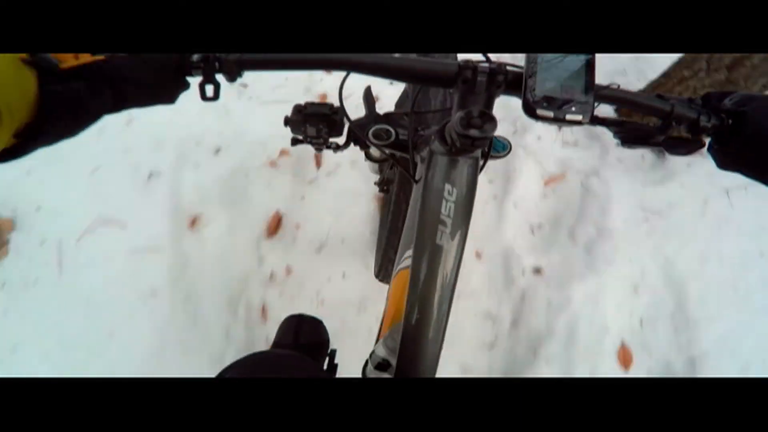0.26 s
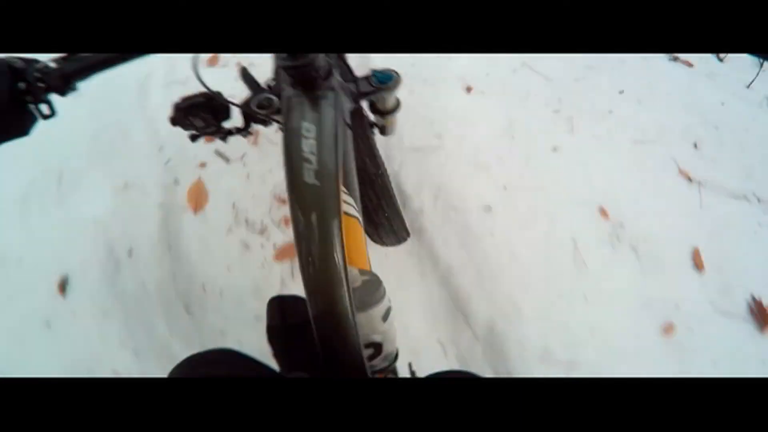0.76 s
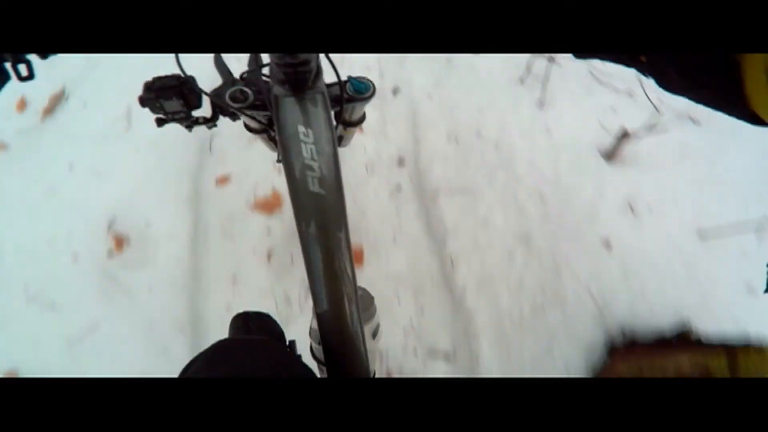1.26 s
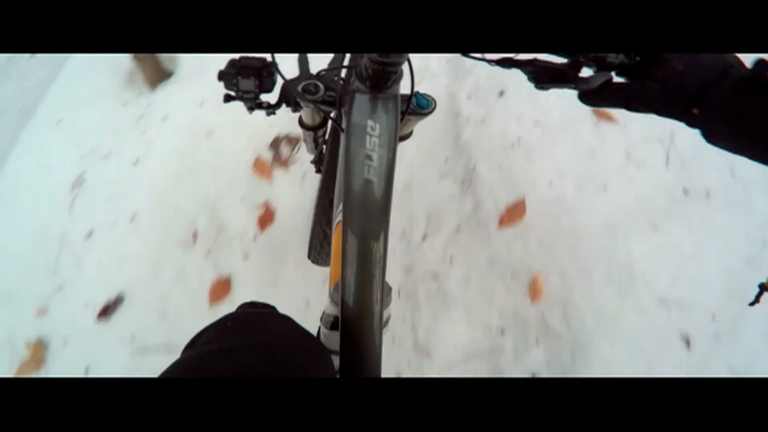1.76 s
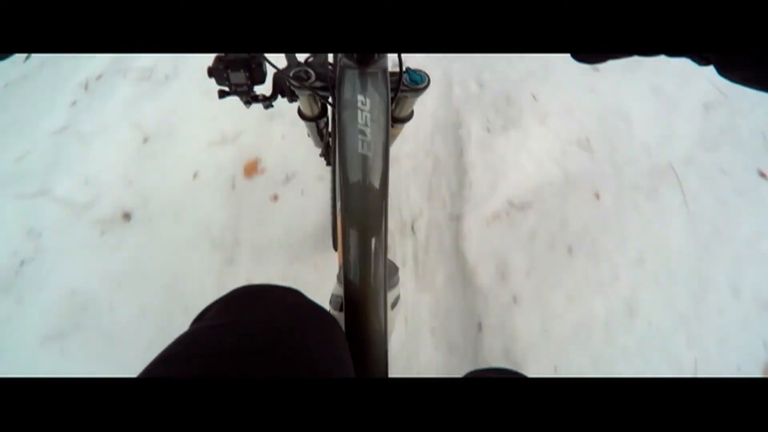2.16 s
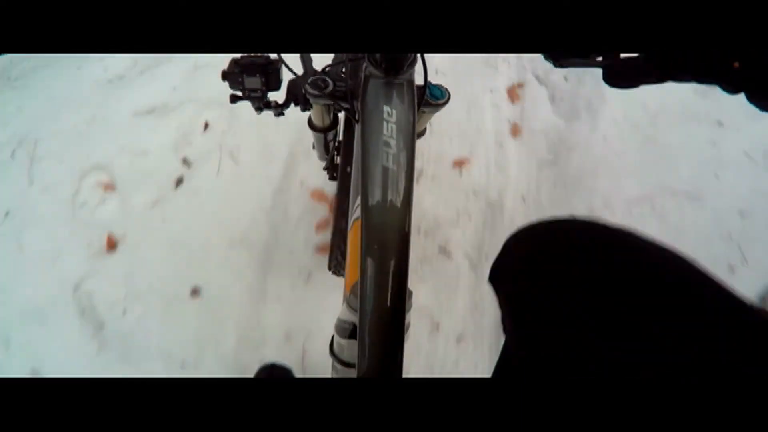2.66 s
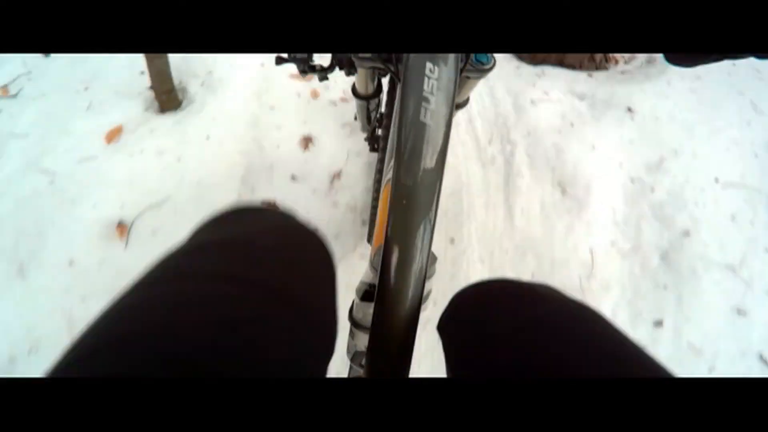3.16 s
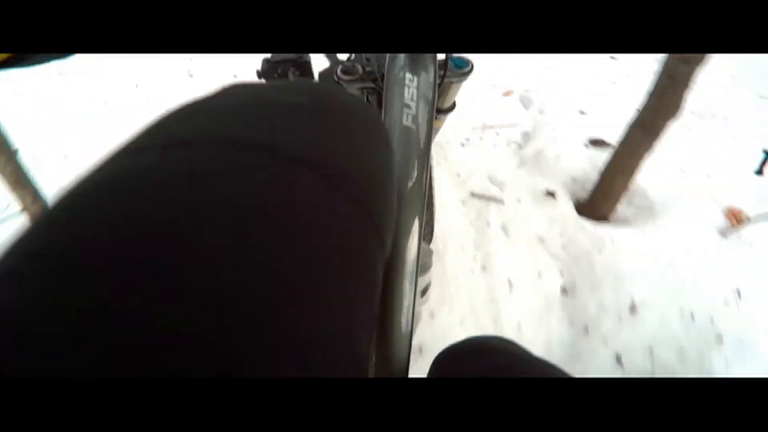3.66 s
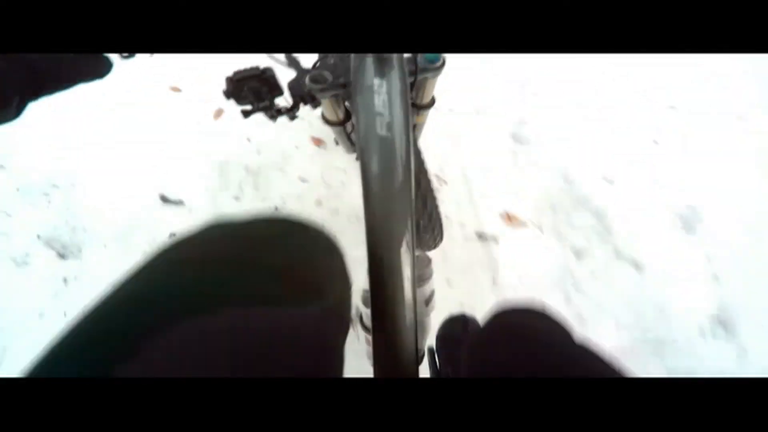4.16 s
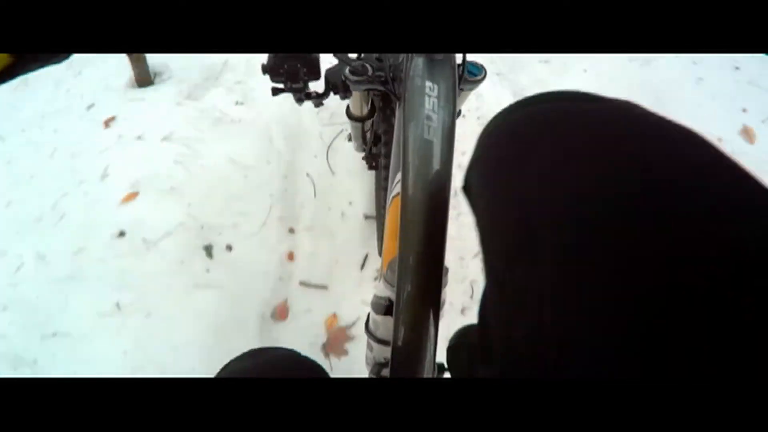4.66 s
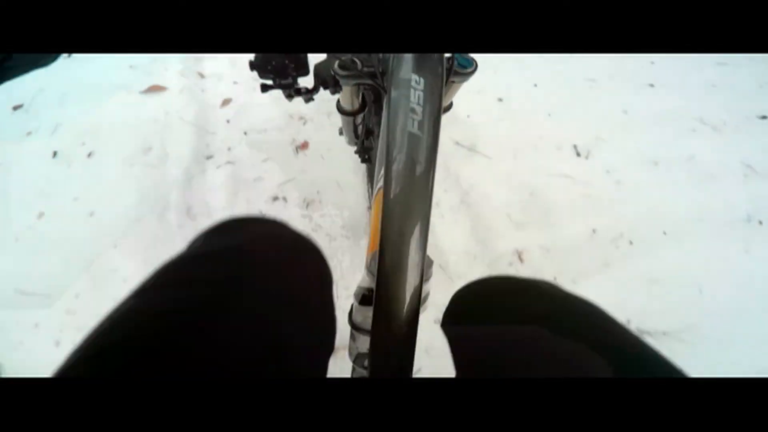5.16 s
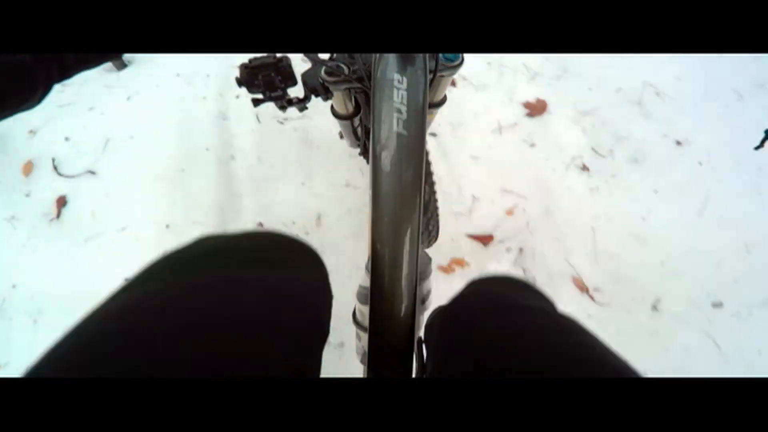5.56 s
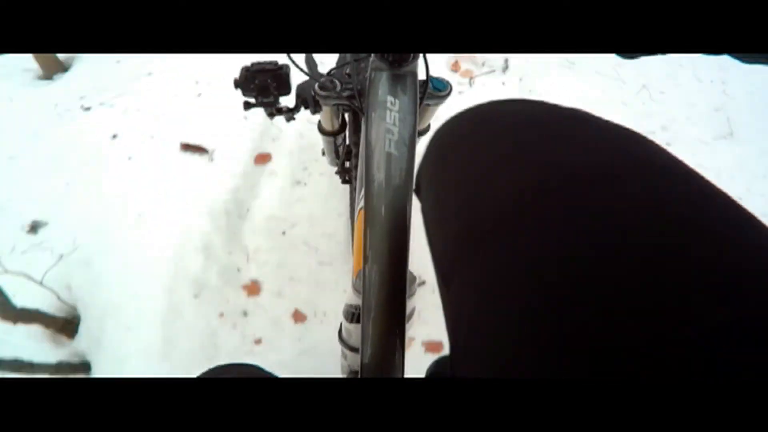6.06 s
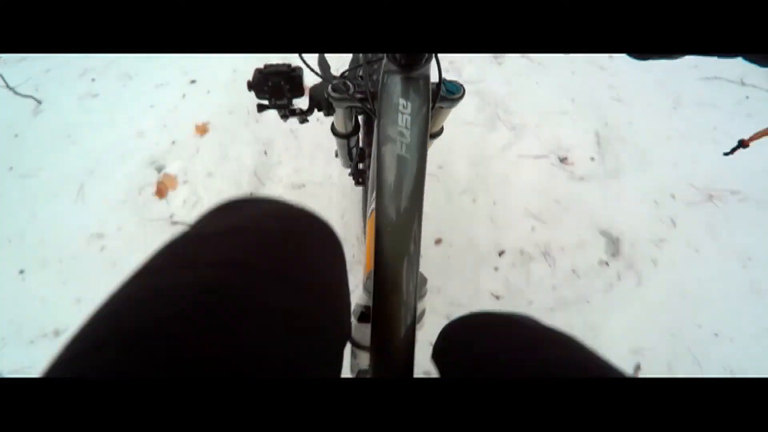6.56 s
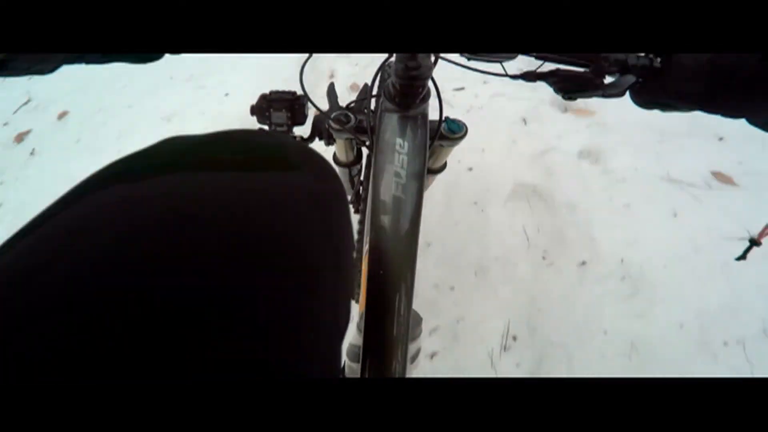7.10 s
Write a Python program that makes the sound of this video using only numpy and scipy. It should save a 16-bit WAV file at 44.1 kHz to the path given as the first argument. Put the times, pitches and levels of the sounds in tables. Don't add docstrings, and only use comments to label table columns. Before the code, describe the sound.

Close, dry outdoor sound from a small body-worn camera on a bike in snow. After a quiet half second, hollow plastic knocks clatter loudly amid snapping crust until just past one second. A lull of soft crunching follows, with one knock near two seconds. Near three, bright steel chain ticks mix with hard knocks. Then quiet rolling and faint pedalling swishes over hiss, with a few dull knocks near the end.

```python
import sys
import numpy as np
from scipy import signal
from scipy.fft import rfft, irfft, next_fast_len
from scipy.io import wavfile
from scipy.ndimage import uniform_filter1d, map_coordinates

SR = 44100
rng = np.random.default_rng(int(sys.argv[2]) if len(sys.argv) > 2 else 0)


def dump(signal):
    limited = np.clip(np.atleast_2d(signal).T, -1, 1)
    pcm = np.round(limited * 32767).astype(np.int16)
    wavfile.write(sys.argv[1], SR, pcm)


def convert_level_to_amplitude(level_db):
    exponent = np.asarray(level_db, float) / 20
    return 10 ** exponent


N = 323473


def unit(x):
    return x / np.sqrt(np.mean(x ** 2) + 1e-20)


def curves(rows):
    s, *cols = np.transpose(rows)
    return [np.interp(np.arange(N) / SR, s, c) for c in cols]


def wobble(rate):
    knots = rng.standard_normal(int(N * rate / SR) + 4)
    return map_coordinates(knots, [np.arange(N) * rate / SR])


def coloured(x, spectrum):
    m = next_fast_len(N + 8192)
    hz, db = np.transpose(spectrum)
    log_hz = np.log(np.fft.rfftfreq(m, 1 / SR) + 1)
    gain = convert_level_to_amplitude(np.interp(log_hz, np.log(hz + 1), db))
    return unit(irfft(rfft(x, m) * gain, m)[:N])


def gritty(rate, spread_db, share):
    size_db = spread_db * np.minimum(rng.exponential(size=N), 3)
    spikes = (rng.random(N) < rate / SR) * rng.standard_normal(N) * convert_level_to_amplitude(size_db)
    return unit(spikes) * np.clip(share, 0, 1) + rng.standard_normal(N) * np.clip(1 - share, 0, 1)


def patchy(x, patchy_db):
    z = signal.stft(x, nperseg=256)[2]
    field = uniform_filter1d(rng.standard_normal(z.shape), size=6, axis=0)
    field = uniform_filter1d(field, size=12, axis=1)
    return signal.istft(z * convert_level_to_amplitude(patchy_db * unit(field)), nperseg=256)[1][:N]


def ring(modes, t, extra_db, rise):
    hz, db, t60 = np.transpose(modes)[:, :, None]
    tones = convert_level_to_amplitude(db + extra_db[:, None] - 60 * t / t60) * np.sin(2 * np.pi * hz * t)
    return tones.sum(0) * (1 - np.exp(-t / rise))


# (f/Hz, level/dB, t60/s)
CASE_MODES = [(159, -7.5, 0.032), (247, -9.5, 0.019), (339, -15, 0.02), (416.5, -18, 0.027),
              (592, -16.5, 0.021), (682, -12, 0.035), (925, -18.5, 0.012), (1170, -9.5, 0.0078),
              (1329, -2, 0.02), (1384, -2.5, 0.014), (1898, -9.5, 0.017), (2370, -15, 0.017),
              (2640, -12.5, 0.0083), (3296, -8, 0.004), (3470, -27, 0.022), (4240, -60, 0.006),
              (4735, -25, 0.0098), (2060, -14, 0.016), (7380, -25, 0.007)]


def blow(t, hard_db, thump_db, lid_db, rise_ms, luck, noise):
    modes = np.array(CASE_MODES)
    hz = modes[:, 0]
    mount, rim, lid = hz < 900, hz > 3000, abs(hz - 1860) < 150
    wall = ~mount & ~rim
    level_db = hard_db * 4 * np.log2(np.clip(hz / 1400, 1, 3))
    level_db += (thump_db + 1.4 * (hard_db - .5) * np.log2(hz / 260)) * mount
    level_db += lid_db * lid + 1.5 * luck
    loaded = t * (1 - .05 * np.clip(rise_ms - .5, 0, 1.5))
    rise = max(rise_ms, .1) / 1000
    shell = ring(modes[wall], loaded, level_db[wall], rise) - ring(modes[rim], loaded, level_db[rim], rise)
    thump = ring(modes[mount], t, level_db[mount], rise=0.00037)
    crack = convert_level_to_amplitude(-13.5 + 7.3 * hard_db - 60 * t / 0.02) * noise
    return shell - thump + crack


# (t/s, peak level/dB, hardness/dB per quarter octave, thump level/dB, lid level/dB)
HARD_KNOCKS = [(0.5899, -29.5, 1.5, -5.5, 2), (0.628, -4.5, 1.7, -1.5, 5), (0.659, -12.5, 0, -3.5, 4.5),
               (0.7322, -22, -0.5, -2.5, 3), (0.85, -6, 0.4, -7.5, 5), (0.9385, -4.5, 0.5, -4.5, 1),
               (1.0411, -13.5, 1.94, -8.5, -6), (1.0506, -3, 0.94, -7.5, -3.5),
               (1.1863, -11, 0.95, -6, -0.5), (2.0708, -20, 1.2, 0.5, 5), (2.29, -32.5, -1, 2.5, -3),
               (2.366, -22.5, 1.14, -1, 1), (2.9135, -13, 0.4, -6.5, 3.5), (2.929, -8.5, 2.5, 2, 0),
               (2.942, -8, 3, -1, 5.5), (3.509, -31.5, 1.1, -0.5, -7), (6.6194, -29, -0.6, 0.5, 1),
               (6.8471, -14.5, 1.27, -2, 6), (6.9416, -26, 0.5, -2, 1.5), (6.9505, -15.5, 0.77, -3.5, 3.5)]
# (t/s, peak level/dB, thump level/dB)
FAINT_TAPS = [(1.568, -46, 10.5), (1.622, -42.5, -12), (1.671, -44, 8.5), (2.6316, -40.5, -12),
              (3.1029, -41.5, -6), (3.373, -44, -7), (4.365, -49, -12), (6.221, -49.5, -1),
              (6.7215, -49.5, -8), (2.273, -48, -14), (2.864, -41, 2.5), (6.833, -48, 6), (6.837, -46, 3),
              (6.9575, -37.5, -8), (1.068, -31.5, 4.5), (.992, -33.5, 5.5)]
# (t/s, peak level/dB, rise/ms)
SOFT_NUDGES = [(.816, -28, 1.3), (0.825, -21.5, 3.7), (0.9052, -13.5, 1.2), (0.912, -16, 2.1),
               (.9335, -18, 1.6), (1.016, -21, 1.46), (1.0197, -15, 1.5), (1.0239, -6.5, 1.35),
               (1.0441, -9.5, 1.6), (1.149, -27.5, 2.1), (2.051, -37.5, 1.4), (3.033, -32, 1.16),
               (5.867, -29, 1.55), (6.0407, -41.5, 1), (6.814, -41, 1.2), (6.914, -41, 1.5),
               (6.9223, -32, 1.3)]


def knocks():
    out, t = np.zeros(N + SR), np.arange(SR // 8) / SR
    rise_ms = 0.45
    blows = [(*row, rise_ms) for row in HARD_KNOCKS]
    blows += [(s, db, 2.3, thump_db, -2.5, rise_ms) for s, db, thump_db in FAINT_TAPS]
    blows += [(s, db, 0.1, -6.5, -6, nudge_ms) for s, db, nudge_ms in SOFT_NUDGES]
    scatter = rng.standard_normal((len(blows), len(CASE_MODES)))
    dull = signal.butter(5, 3900, fs=SR, output="sos")
    cracks = signal.sosfilt(dull, rng.standard_normal((len(blows), len(t))))
    for (s, db, *contact), luck, noise in zip(blows, scatter, cracks):
        out[round((s + .0006) * SR):][:len(t)] += convert_level_to_amplitude(db - 1.0) * blow(t, *contact, luck, noise)
    return signal.sosfilt(signal.butter(2, 110, "high", fs=SR, output="sos"), out[:N])


# (t/s, rattle level/dB)
LOOSENESS = [(0, -70), (.5, -62.5), (.86, -53), (1.05, -52), (1.3, -65), (2, -70.5), (2.3, -66.5),
             (2.96, -57), (3.3, -66), (4, -73), (4.5, -65.5), (4.9, -72), (5.6, -68.5), (6.1, -69),
             (6.4, -72), (6.8, -68.5), (6.96, -62.5), (7.33, -76)]


def rattle():
    body = ring(CASE_MODES[7:11], np.arange(SR // 16) / SR, np.zeros(4), rise=0.00068)
    level = convert_level_to_amplitude(curves(LOOSENESS)[0] + 3.09 * wobble(22))
    contacts = gritty(200, spread_db=3.0, share=0.61)
    return level * unit(signal.fftconvolve(contacts, body)[:N])


# (f/Hz, level/dB, t60/s)
STEEL_MODES = [(2220, -10.5, 0.021), (2870, -3, 0.044), (3886, 1, 0.017), (4570, 1.5, 0.012),
               (5170, -5, 0.038), (5800, 5, 0.017), (6300, 4, 0.0085), (6500, -12.5, 0.014),
               (6840, 1, 0.011), (8150, 3.5, 0.01), (9570, -3.5, 0.014), (12900, -23.5, 0.0086)]
# (t/s, peak level/dB, scrape length/s, brightness/dB, low ping level/dB)
CHAIN_TICKS = [
    (2.724, -10, 0.0054, 5, 1.5),
    (2.7613, -12.5, 0.0067, 1.5, 7.5),
    (2.817, -29.5, 0.0029, 4, -12),
    (2.8232, -25, 0.0026, -12.5, -1.5),
    (2.8502, -12.5, 0.0039, 2, 4),
    (2.877, -30.5, 0.0044, -4, -5),
    (2.9046, -24.5, 0.005, -3, -7),
    (2.969, -23, 0.0044, 6.5, -12),
    (2.98, -29, 0.0038, -0.5, -1),
    (2.9926, -20.5, 0.003, 3, 6),
]


def chain():
    out, t = np.zeros(N + SR), np.arange(SR // 8) / SR
    hz = np.transpose(STEEL_MODES)[0]
    grit_band = signal.butter(2, [4500, 10500], "band", fs=SR, output="sos")
    for s, db, length, bright_db, ping_db in CHAIN_TICKS:
        u = t / max(length, .001)
        scrape = rng.standard_normal(len(t)) ** 3 * u * np.exp(-3 * u)
        colour_db = 3 * bright_db * np.log2(hz / 5500) - 12 * (hz < 3200)
        scatter_db = 1.9 * rng.standard_normal(len(hz))
        body = ring(STEEL_MODES, t, colour_db + scatter_db, rise=.0001)
        grit = unit(signal.sosfilt(grit_band, scrape))
        tick = unit(signal.fftconvolve(scrape, body)[:len(t)]) + convert_level_to_amplitude(-3.5) * grit
        ping = ring(STEEL_MODES[:2], t, rng.normal(0, 3, size=2), rise=0.0019)
        sound = tick / abs(tick).max() + convert_level_to_amplitude(ping_db - 14.5) * ping
        out[round(s * SR):][:len(t)] += convert_level_to_amplitude(db - 4.5) * sound
    return out[:N]


# (t/s, peak level/dB, f/Hz)
CRUST_SNAPS = [(0.0833, -31, 3300), (0.1038, -36, 3600), (0.728, -31.5, 3120), (0.818, -22.5, 4960),
               (0.8646, -29, 3370), (0.871, -23, 3140), (0.8896, -27.5, 5990), (0.928, -19.5, 5300),
               (0.935, -18.5, 2760), (0.95, -31.5, 5406), (0.983, -20, 3420), (0.988, -26.5, 3500),
               (0.9944, -16.5, 4900), (1.1274, -29, 3120), (1.2223, -26.5, 3200), (1.3795, -27.5, 5700),
               (1.42, -28.5, 5400), (2.1445, -40.5, 3700), (2.614, -39, 2940), (2.6309, -32.5, 3800),
               (3.0313, -25.5, 3120), (3.156, -38.5, 3270), (3.1746, -28.5, 5800), (4.184, -39, 3600),
               (4.364, -39.5, 2740), (4.4937, -45.5, 4700), (4.965, -35.5, 5490), (7.2588, -43, 4660),
               (2.274, -29, 2018)]


def snaps():
    out, t = np.zeros(N + SR), np.arange(SR // 40) / SR
    for s, db, hz in CRUST_SNAPS:
        fracture = rng.standard_normal(len(t)) * convert_level_to_amplitude(-60 * t / 0.012)
        resonance = np.sin(2 * np.pi * hz * t) * np.exp(-t * hz / 0.97)
        crack = signal.fftconvolve(fracture, resonance)
        out[round(s * SR):][:len(t)] += convert_level_to_amplitude(db - 3.5) * crack[:len(t)] / abs(crack).max()
    return out[:N]


# (t/s, level/dB)
ROLLING = [(0, -60), (.55, -59), (.62, -52.5), (1.1, -51.5), (1.3, -57), (2.3, -58.5), (2.6, -57),
           (2.72, -55.5), (3.04, -55), (3.1, -61), (3.95, -62.5), (4.7, -63), (5.5, -61.5), (6.3, -62.5),
           (6.5, -67.5), (6.7, -62), (7.2, -66.5), (7.33, -63.5)]
# (start t/s, length/s, level/dB, spray over crunch/dB)
CRUST_PATCHES = [(.07, 0.069, -59, -1), (0.266, 0.15, -66, 5.5), (.655, 0.042, -45, -5),
                 (0.718, 0.061, -48, 1), (0.769, 0.062, -45, 3), (0.854, 0.096, -46, 5.5),
                 (0.962, .04, -46.5, 5.5), (1.026, .06, -49, -0.5), (1.14, 0.036, -54.5, -0.5),
                 (1.377, 0.09, -67.5, 0.5), (1.564, 0.097, -60, 2.2), (1.673, 0.063, -61.5, -2.5),
                 (1.924, 0.15, -68.5, 6), (2.068, 0.18, -63, 5.5), (2.36, 0.16, -58.5, -6),
                 (2.772, 0.055, -53.5, 3), (2.866, 0.062, -50.5, -7), (2.967, 0.043, -61, 10.5),
                 (3.024, 0.035, -55, 5.5), (3.148, 0.043, -63, .4)]
# (start t/s, length/s, level/dB, spray over crunch/dB)
PEDAL_STROKES = [(3.48, 0.142, -58, -5.5), (3.6, 0.1204, -61, 2.5), (4.02, 0.19, -64, 10.5),
                 (4.13, .19, -62, 2.5), (4.329, 0.073, -65.5, 7), (4.48, 0.14, -65.5, 5),
                 (4.82, 0.23, -64.5, 3.5), (5, .13, -65, 3.5), (5.17, 0.11, -59, -7), (5.3, .08, -59, -14),
                 (5.53, .14, -56.5, -4.5), (5.88, 0.18, -63.5, -4), (6.33, 0.13, -66, 3),
                 (6.6, 0.13, -68.5, -4), (6.9, 0.22, -59, -1.5)]


def effort():
    roll_db, = curves(ROLLING)
    mean_db = roll_db.mean()
    spray_db = mean_db - 2 + 1.18 * (roll_db - mean_db)
    power, t = convert_level_to_amplitude(2 * np.array([roll_db, spray_db])), np.arange(N) / SR
    bursts = [(*row, 0.23, 0.94) for row in CRUST_PATCHES]
    bursts += [(*row, .45, .6) for row in PEDAL_STROKES]
    for s, length, db, spray_over_db, swell, fade in bursts:
        u = (t - s) / length
        shape = np.clip(np.minimum(u / swell, (1 - u) / fade + .5), 0, 1)
        power = power + convert_level_to_amplitude(2 * np.array([[db], [db + spray_over_db]])) * shape ** 2
    return 10 * np.log10(power)


# (f/Hz, level/dB per Hz)
CRUNCH_SPECTRUM = [(900, -32), (1800, -9), (2400, -7), (3000, -2), (3500, -1), (4300, -4.5), (7000, -13),
                   (12000, -43.5)]
# (f/Hz, level/dB per Hz)
SWISH_SPECTRUM = [(2500, -24.5), (4200, -6.5), (5400, 0.5), (6700, -2.5), (7900, -3.5), (9000, -5),
                  (11000, -9.5), (13500, -18), (15500, -24)]


def riding():
    crunch_db, swish_db = effort()
    bumps = convert_level_to_amplitude(1.3 * wobble(60))
    grains = patchy(gritty(1200, spread_db=4, share=0.45), patchy_db=1.0)
    crunch = coloured(grains, CRUNCH_SPECTRUM) * bumps
    friction = patchy(gritty(1500, spread_db=0.0, share=0.51), patchy_db=2.5)
    swish = coloured(friction, SWISH_SPECTRUM) * bumps
    return convert_level_to_amplitude(crunch_db + 1.5) * unit(crunch) + convert_level_to_amplitude(swish_db + 1.5) * unit(swish)


# (f/Hz, level/dB per Hz)
RUMBLE_SPECTRUM = [(24, -21.5), (40, -1.5), (211, 0), (268, -1.5), (293, 0.5), (1070, -9), (1300, -7),
                   (1770, -12.5), (2500, -13.5), (3250, -20.5), (5500, -120)]


def wind():
    rumble = coloured(rng.standard_normal(N), RUMBLE_SPECTRUM)
    rumble = unit(rumble * convert_level_to_amplitude(1.1 * wobble(14)))
    crunch_db = uniform_filter1d(effort()[0], size=3000)
    return convert_level_to_amplitude(-59.5 + .6 * (crunch_db - crunch_db.mean())) * rumble


# (f/Hz, level/dB per Hz)
HISS_SPECTRUM = [(12, 17.5), (28, 6.5), (45, -5.5), (400, -28.5), (2500, -17.5), (7800, -17), (10000, -19),
                 (13500, -25), (15800, -40.5)]


def self_noise():
    return convert_level_to_amplitude(-59) * coloured(rng.standard_normal(N), HISS_SPECTRUM)


def whine():
    phase = 2 * np.pi * 7692 * np.arange(N) / SR + 0.7 * wobble(9)
    return convert_level_to_amplitude(-73.5 + 1.4 * wobble(12.0)) * np.sqrt(2) * np.sin(phase)


def scene():
    mix = knocks() + rattle() + chain() + snaps() + riding()
    mix = mix + wind() + self_noise() + whine()
    return mix[None]


def treble_holes(x):
    hz, _, z = signal.stft(x, SR, nperseg=1024)
    luck = rng.random((len(hz) // 6 + 1, z.shape[-1] // 3 + 1))
    luck = luck.repeat(6, 0).repeat(3, 1)[:len(hz), :z.shape[-1]]
    chance = .12 * np.clip((hz - 9500) / 3500, 0, 1) + (hz > 15750)
    return signal.istft(z * (luck > chance[:, None]), SR, nperseg=1024)[1][:, :N]


# (start t/s, end t/s)
DULL_SPANS = [(.627, .653), (.85, .942), (1.011, 1.069), (1.171, 1.198), (1.398, 1.422), (2.069, 2.092),
              (2.354, 2.381), (2.708, 2.765), (2.834, 2.861), (2.914, 2.964), (6.619, 6.646),
              (6.844, 6.869), (6.94, 6.965)]


def dull_blows(x):
    m = next_fast_len(N)
    top = irfft(rfft(x, m) * (np.fft.rfftfreq(m, 1 / SR) > 8700), m)[:, :N]
    t = np.arange(N) / SR
    muted = sum((t > start) & (t < end) for start, end in DULL_SPANS)
    return x - top * uniform_filter1d(muted * 1., size=128)


def low_pass(x):
    return signal.sosfilt(signal.butter(12, 15800, fs=SR, output="sos"), x)


def record(dry):
    x = dry / (1 + abs(dry / .78) ** 4) ** (1 / 4)
    x = dull_blows(treble_holes(x))
    return low_pass(x)


dry = scene()
out = record(dry)
dump(out)
```